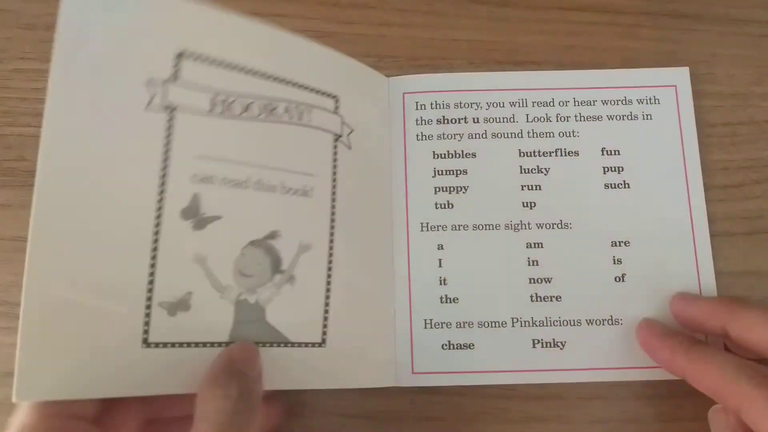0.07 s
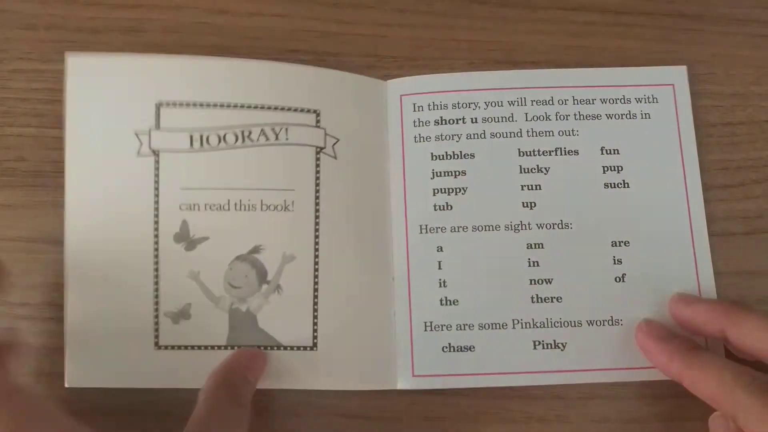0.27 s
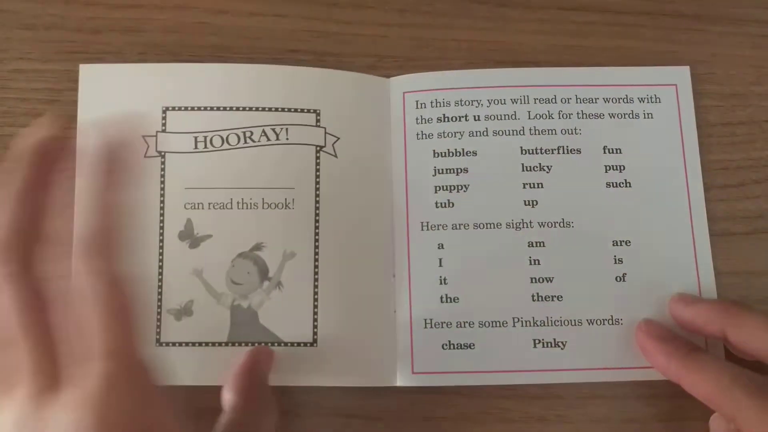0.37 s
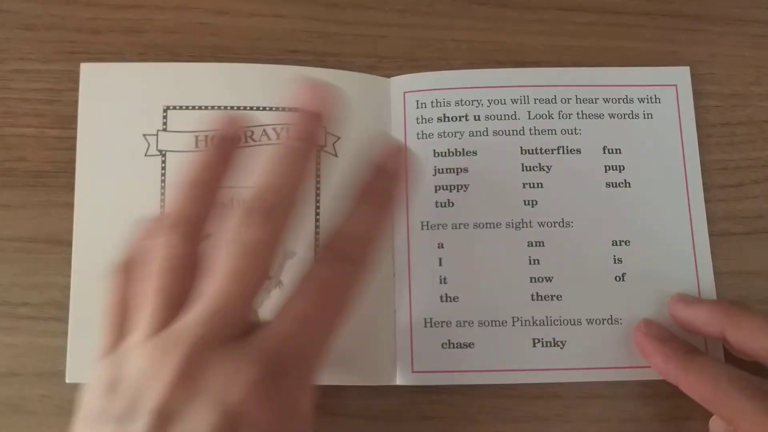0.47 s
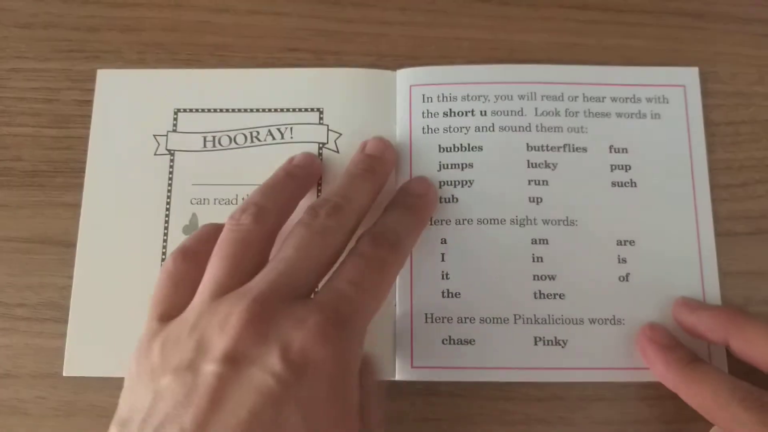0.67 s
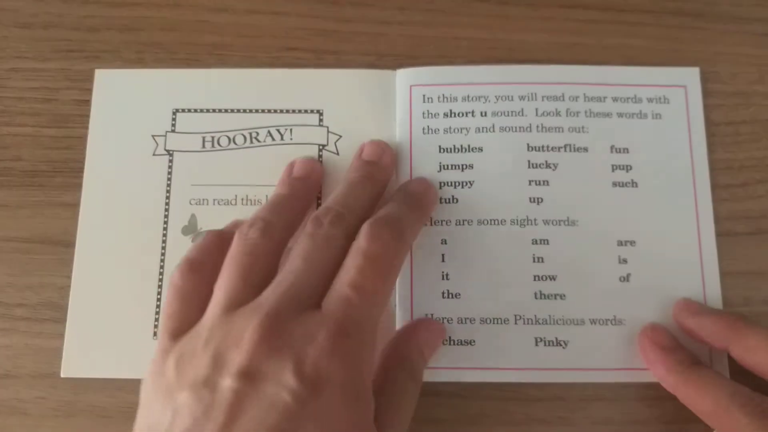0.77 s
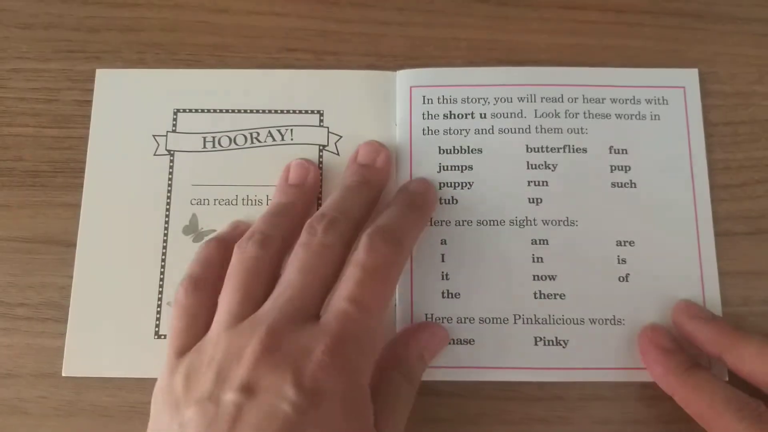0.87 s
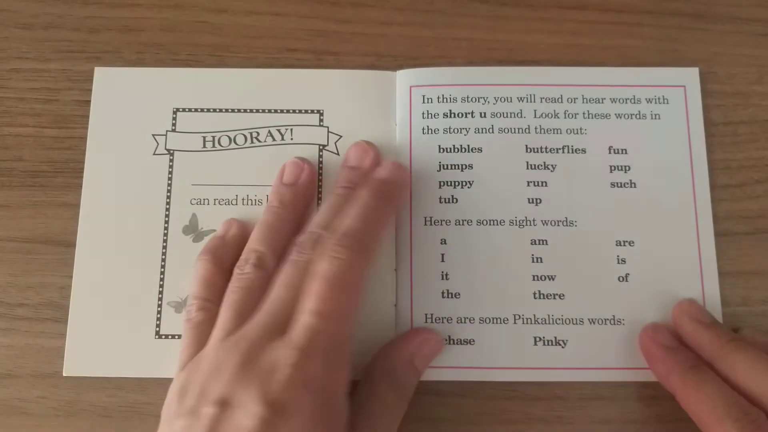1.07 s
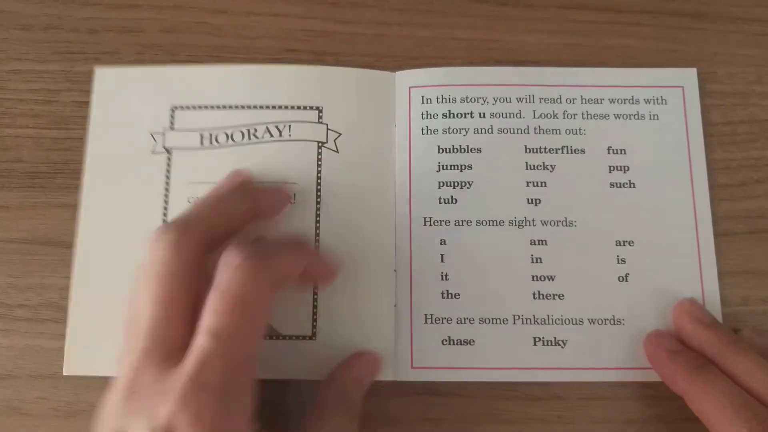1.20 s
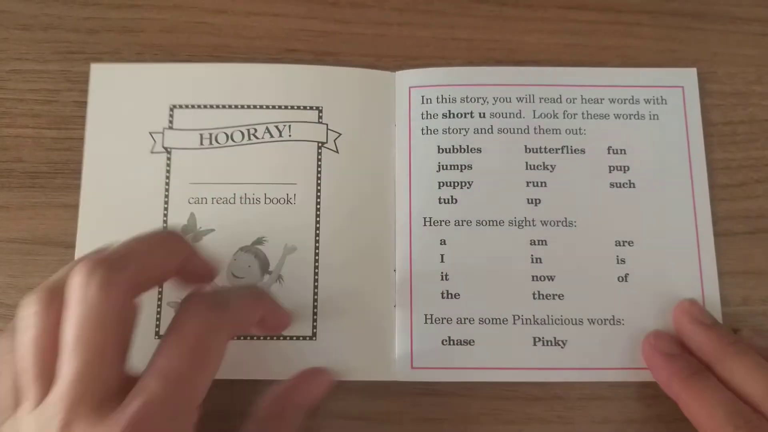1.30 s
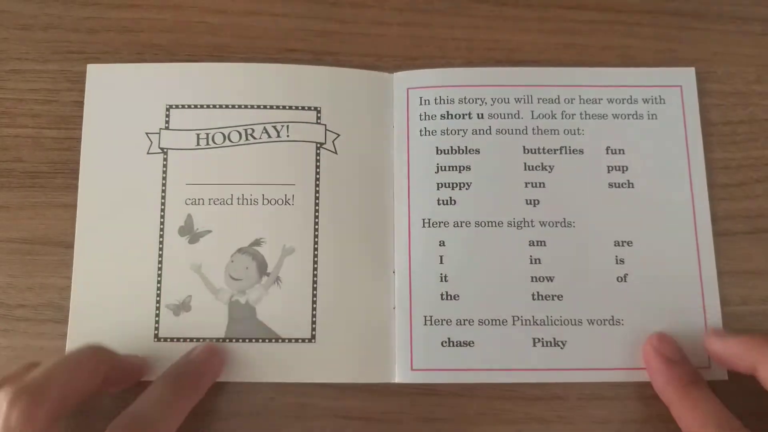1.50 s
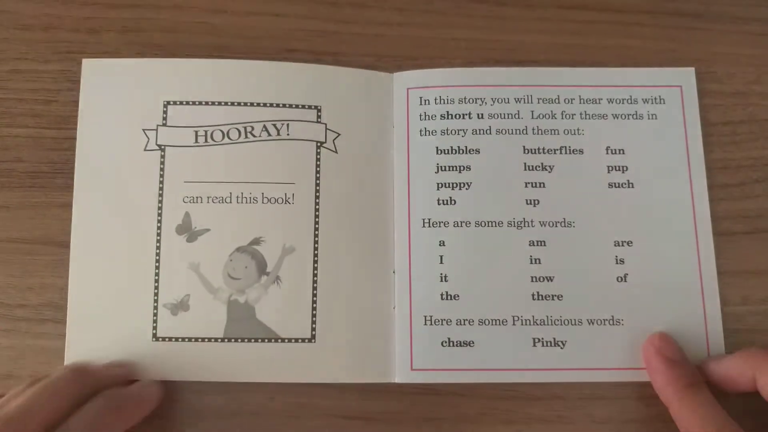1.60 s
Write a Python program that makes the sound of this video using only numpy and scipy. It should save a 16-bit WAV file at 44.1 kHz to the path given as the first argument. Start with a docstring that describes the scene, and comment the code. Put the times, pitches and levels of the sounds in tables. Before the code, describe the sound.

A thin paperback opens on a wooden table in a small quiet room. At about 0.2 seconds the cover slides and flaps down, then snaps free with a brief rustle of pages. Near 0.7 seconds a hand swishes along the fold, pressing it flat. From 1.1 seconds it brushes back over the page, which springs up with a soft crackle around 1.25 seconds. Faint rubbing lasts until about 1.6 seconds.

```python
"""Opening a paperback.

A thin paperback on a wooden table in a small quiet room. The cover slides off the thumb, flaps
against the table and lets go with a snap that sets the pages shivering. A hand presses the fold
flat, then slides back over the page, which springs up with a soft crackle. Rubbing is fibres
catching and slipping; the knocks ring modes of the card and the table top."""
import sys
import numpy as np
from scipy import signal
from scipy.fft import rfft, irfft
from scipy.io import wavfile

SR = 44100
rng = np.random.default_rng(int(sys.argv[2]) if len(sys.argv) > 2 else 0)


def unload_audio(sound):
    """Save the sound as a 16-bit wav file, at the path given as the first command line argument."""
    columns = np.transpose(np.atleast_2d(sound))
    # keep every value between -1 and 1, then stretch to whole-number steps
    steps = np.round(np.clip(columns, -1, 1) * 32767)
    wavfile.write(sys.argv[1], SR, steps.astype(np.int16))


N = 72765
TIME_S = np.arange(N) / SR
FFT_SIZE = 2 ** 17
BINS_HZ = np.maximum(np.arange(FFT_SIZE // 2 + 1) * SR / FFT_SIZE, 1)
CUTOFF_HZ = 15850
CATCH_S = .272  # the cover's edge catches
SNAP_S = CATCH_S + .0012  # and comes free

# spectrum of room noise and microphone hiss: (frequency [Hz], level [dB])
NOISE_SPECTRUM = [(25, -9), (60, -7.5), (110, 0.5), (200, -3), (400, -8.5), (800, -9), (1300, -14.5),
                  (1900, -17), (2500, -21), (4000, -25), (7000, -26.5), (9000, -27), (12500, -25),
                  (15800, -28)]


def from_db(db):
    """Decibels to gain."""
    return 10 ** (np.asarray(db) / 20)


def unit_rms(x):
    """Scale to unit power."""
    return x / np.sqrt(np.mean(x ** 2) + 1e-20)


def at_hz(points, hz):
    """Interpolate on a log-frequency axis."""
    point_hz, value = np.transpose(points)
    return np.interp(np.log(hz), np.log(point_hz), value)


def envelope(curve):
    """Gain from (time [s], level [dB]) points, silent outside them."""
    s, db = np.transpose(curve)
    return from_db(np.interp(TIME_S, s, db, left=-200, right=-200))


def swell(centre_s, half_s):
    """Bell-shaped envelope."""
    return np.exp(-((TIME_S - centre_s) / half_s) ** 2)


def colour(x, spectrum, tilt_db_per_oct=0):
    """Unit-energy filter with this spectrum, rolled off below its first point and above the cutoff."""
    low_cut = np.minimum(BINS_HZ / spectrum[0][0], 1) ** 2
    high_cut = 1 / np.hypot(1, (BINS_HZ / CUTOFF_HZ) ** 20)
    shape_db = at_hz(spectrum, BINS_HZ) + tilt_db_per_oct * np.log2(BINS_HZ)
    gain = unit_rms(low_cut * from_db(shape_db) * high_cut)
    cepstrum = irfft(np.log(gain + 1e-6))
    cepstrum[1:FFT_SIZE // 2] *= 2  # fold to minimum phase
    cepstrum[FFT_SIZE // 2 + 1:] = 0
    return irfft(rfft(x, FFT_SIZE) * np.exp(rfft(cepstrum)))[:N]


def resonate(x, hz, width_hz, stages=1):
    """Two-pole resonators in series, unit peak gain."""
    r = np.exp(-np.pi * width_hz / SR)
    b = np.array([1, 0, -1]) * (1 - r * r) / 2
    a = [1, -2 * r * np.cos(2 * np.pi * hz / SR), r * r]
    for _ in range(stages):
        x = signal.lfilter(b, a, x + 1e-18)
    return x


def click(s):
    """Unit impulse."""
    return 1. * (np.arange(N) == int(s * SR))


def burst(start_s, t60_s):
    """Decaying noise of unit energy."""
    decay = from_db(-60 * np.minimum(abs(TIME_S - start_s) / t60_s, 4))
    x = rng.standard_normal(N) * (TIME_S >= start_s) * decay
    return x / np.linalg.norm(x)


def background():
    """Steady room noise with a low hum."""
    # room tones: (frequency [Hz], level [dB])
    tones = [(99, -75), (135, -76), (192, -80), (240, -80)]
    hum = sum(from_db(db) * np.sin(2 * np.pi * (hz * TIME_S + rng.random())) for hz, db in tones)
    return hum + from_db(-70) * colour(rng.standard_normal(N), NOISE_SPECTRUM)


def friction(grains_per_s=1800, spread_db=3.5, grain_share=.33):
    """Paper fibres catch and slip: tiny uneven clicks in a smooth hiss."""
    sizes = from_db(spread_db * np.minimum(rng.exponential(1, N), 4)) * rng.choice([-1, 1], N)
    grains = unit_rms(sizes * (rng.random(N) < grains_per_s / SR))
    return np.sqrt(grain_share) * grains + np.sqrt(1 - grain_share) * rng.standard_normal(N)


def finger_touches():
    """Fingers graze the paper in short swells of friction."""
    # touches: (time [s], half length [s], level [dB], tilt [dB/octave])
    touches = [(0.009, 0.047, -67, -1), (.556, 0.016, -62, -2.5), (0.597, 0.043, -71, -5.5),
               (1.616, 0.013, -57.5, 7.5)]
    # finger on paper: (frequency [Hz], level [dB])
    spectrum = [(1000, -6), (1950, 4.5), (2800, -5), (4600, 3), (6300, -6.5), (9000, 6.5), (11000, -3),
                (14000, -4), (16000, -6.5)]
    return sum(colour(from_db(db) * swell(s, half_s) * friction(), spectrum, tilt)
               for s, half_s, db, tilt in touches)


def rubs():
    """Friction strokes, each coloured by its surfaces."""
    # each stroke: envelope (time [s], level [dB]), then spectrum (frequency [Hz], level [dB])
    # cover slides off the thumb
    slide = [(.08, -85), (.165, -72.5), (.18, -63.5), (.19, -38.5), (.197, -51), (.208, -47.5),
             (.216, -50.5), (.223, -40.5), (.232, -46), (.245, -50), (.268, -49.5), (.28, -59), (.3, -97)]
    slide_spectrum = [(150, -11.5), (300, -1), (700, -2), (1100, -2.5), (1750, 3.5), (2600, -9),
                      (4600, 2.5), (6300, -12), (8700, -4), (11000, -15), (16000, -18.5)]
    # palm drags ahead of the press
    palm = [(.612, -88), (.63, -61), (.67, -58), (.705, -60.5), (.72, -60)]
    palm_spectrum = [(1100, -30), (1600, -6), (1950, 0.5), (2450, -8.5), (3300, -1), (5000, -28),
                     (9000, -22)]
    # hand presses along the fold
    press = [(.61, -100), (.63, -66.5), (.655, -55.5), (.68, -42.5), (.706, -38), (.716, -58), (.77, -69.5),
             (.83, -96)]
    press_spectrum = [(1100, -22), (1550, -22), (1900, -7.5), (2400, -16.5), (3000, -8.5), (3850, 7.5),
                      (4200, 6), (4550, -1.5), (5000, 4.5), (5700, -2.5), (6400, -1), (7000, -6),
                      (7600, 3.5), (8700, -5.5), (9800, -1.5), (12000, -6.5), (15800, -15.5)]
    # skin brushes the page
    brush = [(1.07, -101), (1.09, -62.5), (1.105, -73), (1.13, -60.5), (1.152, -64.5), (1.167, -50.5),
             (1.183, -61.5), (1.197, -55.5), (1.23, -57), (1.29, -60.5), (1.33, -83), (1.4, -77)]
    brush_spectrum = [(710, -50), (1200, -11.5), (1350, -35.5), (1830, -9.5), (2080, -22.5), (3170, -7.5),
                      (3420, -14), (3850, -3), (4430, -10), (4820, -7.5), (8270, -3.5), (11900, -7.5),
                      (15800, -18)]
    # released fold scrapes as it springs up
    spring = [(1.251, -80), (1.259, -47.5), (1.272, -52), (1.288, -51), (1.305, -61.5), (1.36, -67)]
    spring_spectrum = [(300, -21), (1150, -11.5), (1450, -17), (2100, 1.5), (2500, -6.5), (2950, 2),
                       (3400, -4.5), (4600, 3.5), (6000, -7.5), (8000, -7), (12000, -25), (16000, -38)]
    # lifting page rubs its neighbour
    lift = [(1.25, -91), (1.28, -63.5), (1.365, -63.5), (1.405, -65.5), (1.44, -61.5), (1.55, -65),
            (1.575, -83.5), (1.65, -73.5)]
    lift_spectrum = [(710, -49), (1200, -13), (1310, -20), (1520, -21), (1620, -17), (2130, -9),
                     (2610, -16), (3000, -27), (3530, -17), (3970, -14.5), (4720, -5), (5860, -14.5),
                     (7430, -11.5), (8010, -4.5), (9620, -7), (12600, -10.5), (15800, -23)]
    strokes = [(slide, slide_spectrum), (palm, palm_spectrum), (press, press_spectrum),
               (brush, brush_spectrum), (spring, spring_spectrum), (lift, lift_spectrum)]
    return sum(colour(envelope(curve) * friction(), spectrum) for curve, spectrum in strokes)


def air_puff():
    """The falling cover pushes air aside."""
    # dull puff: (frequency [Hz], level [dB])
    spectrum = [(70, -4), (110, 0), (200, -6.5), (400, -4.5), (800, -8), (2000, -39.5)]
    return from_db(-21.5) * colour(burst(start_s=.1905, t60_s=.088), spectrum)


def table_thump(low_cut_hz=70):
    """The table top rings briefly at each landing; it radiates little deep bass."""
    # cover landings: (time [s], level [dB])
    landings = [(0.1923, -47), (.236, -54.5), (.276, -52)]
    # table modes: (frequency [Hz], level [dB], t60 [s])
    modes = [(107, -3.5, 0.12), (139, -11, .3), (210, -8, .08)]
    rings = np.zeros(N)
    for s, db in landings:
        age_s = np.maximum(TIME_S - s, 0)
        for hz, mode_db, t60_s in modes:
            rings += from_db(db + mode_db - 60 * age_s / t60_s) * np.sin(2 * np.pi * hz * age_s)
    return signal.sosfilt(signal.butter(4, low_cut_hz, "high", fs=SR, output="sos"), rings + 1e-18)


def cover_flaps(relative_bandwidth=.87):
    """Soft pitched contacts with the table ring the well-damped card."""
    # contacts: (time [s], level [dB], pitch [Hz])
    contacts = [(0.1929, -20.5, 1190), (0.1956, -18, 1590), (0.2007, -12.5, 1300), (.2225, -19.5, 1800),
                (0.2285, -14.5, 1050), (0.2373, -14, 1100), (0.2741, -8, 1700), (0.2813, -6, 1500)]
    # card modes: (frequency [Hz], level [dB], t60 [s])
    modes = [(291.6, -20, 0.053), (426, -24.5, .03), (827, -18, 0.023), (1050, -18.5, 0.022),
             (1173, -17, 0.022), (1405, -20, 0.014), (1730, -23, .02), (1853, -19.5, 0.028),
             (2260, -24.5, .02), (3150, -18.5, 0.004), (3552, -21.5, 0.035), (4470, -17, 0.018)]
    force = sum(from_db(db) * resonate(click(s), hz, relative_bandwidth * hz, stages=2)
                for s, db, hz in contacts)
    card = np.zeros(N)
    for hz, db, t60_s in modes:
        width_hz = np.log(1000) / (np.pi * t60_s)
        unit_ring_gain = SR / (2 * np.pi * width_hz)
        card += from_db(db) * unit_ring_gain * resonate(force, hz, width_hz)
    return card


def cover_snap():
    """The cover's edge catches dully, then frees with a sharp click and a papery ring."""
    # snap: (frequency [Hz], level [dB])
    spectrum = [(150, -14), (700, -7), (1800, -7), (2800, -6.5), (3750, 2.5), (4200, 2.5), (5600, 5),
                (7400, -4.5), (8200, 3), (9300, 0), (10700, -10), (13000, -5), (15800, -14.5)]
    catch = colour(click(CATCH_S), spectrum, tilt_db_per_oct=-.5)
    ring = from_db(-2) * burst(SNAP_S, t60_s=.011)
    release = colour(click(SNAP_S) + ring, spectrum)
    return from_db(-7) * catch + from_db(-2) * release


def page_shiver():
    """The snap sets off a dying rustle in the pages."""
    # rustle: (frequency [Hz], level [dB])
    spectrum = [(200, -3.5), (600, -2.5), (1000, 1), (1400, 7.5), (2200, -4), (3000, 0), (4700, -7.5),
                (7000, -1.5), (9000, -5), (12000, -8.5), (16000, -15.5)]
    return from_db(-11) * colour(burst(SNAP_S, t60_s=.26), spectrum)


def creases():
    """Small creases in the fold give way and crackle."""
    # crackles: (time [s], level [dB], tilt [dB/octave])
    crackles = [(0.536, -39.5, 12), (.592, -44, -8), (.883, -46.5, 9), (1.041, -42, -10),
                (1.086, -41, -10.5), (1.124, -47.5, -12), (1.252, -22.5, -2.5), (1.2562, -28.5, 0),
                (1.26, -31.5, -2), (1.267, -31, 3)]
    # crackle: (frequency [Hz], level [dB])
    spectrum = [(500, -18.5), (1100, -13), (1450, -10.5), (2050, 2), (2450, -9.5), (3000, -1), (4700, 8),
                (6200, -6.5), (8000, -1), (12000, -14), (16000, -14)]
    return sum(from_db(db) * colour(burst(s, t60_s=.016), spectrum, tilt) for s, db, tilt in crackles)


def finger_squeak(centre_s=1, centre_hz=12500, rise_hz_per_s=1800, jitter_hz=700):
    """A finger creeps over the page with one faint, high squeak."""
    hz = centre_hz + rise_hz_per_s * (TIME_S - centre_s) + jitter_hz * rng.standard_normal(N)
    return from_db(-80) * swell(centre_s, half_s=.05) * np.sin(2 * np.pi * np.cumsum(hz) / SR)


def hand_whistle(width_hz=310):
    """The sliding hand's unsteady friction tone sinks as it slows."""
    # glide: (time [s], pitch [Hz], level [dB])
    glide = [(1.32, 3680, -69.5), (1.366, 3580, -62.5), (1.4, 3500, -69.5), (1.461, 3450, -75.5),
             (1.497, 3250, -67.5), (1.51, 3300, -80), (1.56, 3250, -87.5)]
    s, hz, db = np.transpose(glide)
    low_pass = signal.butter(2, width_hz / 2, fs=SR, output="sos")
    wobble = signal.sosfilt(low_pass, rng.standard_normal((2, N)))
    phase = 2 * np.pi * np.cumsum(np.interp(TIME_S, s, hz)) / SR
    tone = unit_rms(wobble[0] * np.cos(phase) + wobble[1] * np.sin(phase))
    return envelope(list(zip(s, db))) * tone


def room(x, gap_s=.0036):
    """Diffuse tail, longest in the bass; a new one at each call."""
    # tail bands: (centre [Hz], level re input [dB], t60 [s])
    bands = [(121, -8, 0.72), (500, -16, .33), (1500, -13.5, 0.42), (4000, -9, .3), (9000, -13.5, 0.33),
             (15100, -14.5, 0.3)]
    centres_hz = [row[0] for row in bands]
    tail = 0
    for weights, (_, db, t60_s) in zip(np.eye(len(bands)), bands):
        band_gain = np.sqrt(at_hz(list(zip(centres_hz, weights)), BINS_HZ))  # equal-power crossovers
        tail = tail + from_db(db) * band_gain * rfft(burst(gap_s, t60_s), FFT_SIZE)
    return irfft(rfft(x, FFT_SIZE) * tail)[:N]


def microphone(x, hz, width_hz, boost_db):
    """One resonance, plus a trace of the microphone's own hiss and rumble."""
    # rumble: (frequency [Hz], level [dB])
    rumble_spectrum = [(20, 0), (60, -9.5), (200, -26.5), (2000, -49)]
    hiss = from_db(-100) * colour(rng.standard_normal(N), NOISE_SPECTRUM)
    rumble = from_db(-102) * colour(rng.standard_normal(N), rumble_spectrum)
    peak = (from_db(boost_db) - 1) * resonate(x, hz, width_hz, stages=2)
    return x + peak + hiss + rumble


def scene():
    """The book in its room, almost straight ahead of both microphones."""
    snap_send_db = -3  # the snap stirs the room less than the other sounds
    side_db, left_lag_s = -41, 2e-6
    snap = cover_snap()
    cover = cover_flaps() + table_thump() + air_puff() + page_shiver()
    paper = creases() + rubs() + hand_whistle() + finger_touches() + finger_squeak()
    mid = cover + paper + room(from_db(snap_send_db) * snap + cover + paper) + background()
    side = from_db(side_db) * room(snap + cover)
    late_snap = irfft(rfft(snap, FFT_SIZE) * np.exp(-2j * np.pi * BINS_HZ * left_lag_s))[:N]
    return np.array([mid + late_snap + side, mid + snap - side])


def record(dry):
    """Two microphones side by side, then a steep low-pass."""
    # resonances, left then right: (frequency [Hz], width [Hz], boost [dB])
    peaks = [(1780, 570, 5), (9560, 530, 6)]
    heard = [microphone(x, *peak) for x, peak in zip(dry, peaks)]
    return signal.sosfilt(signal.ellip(10, .1, 80, CUTOFF_HZ, fs=SR, output="sos"), heard)


dry = scene()
out = record(dry)
unload_audio(out)
```